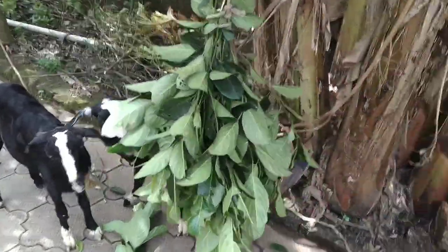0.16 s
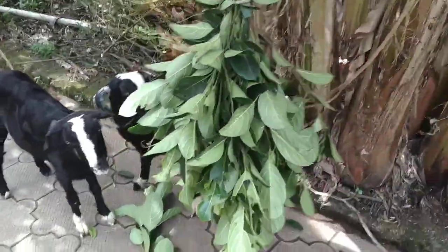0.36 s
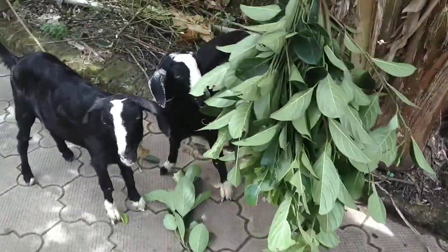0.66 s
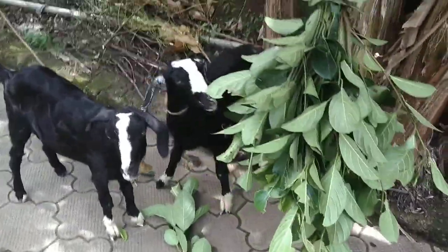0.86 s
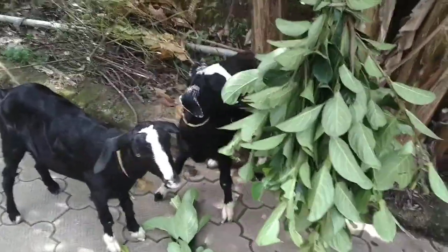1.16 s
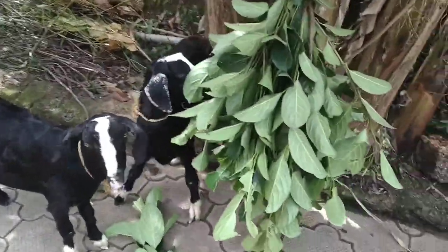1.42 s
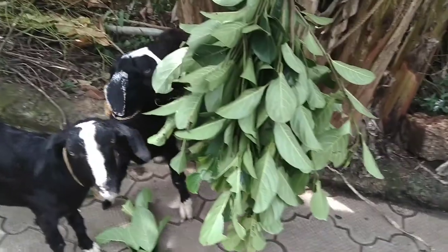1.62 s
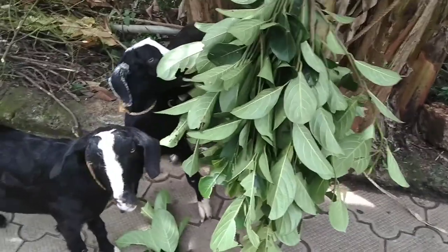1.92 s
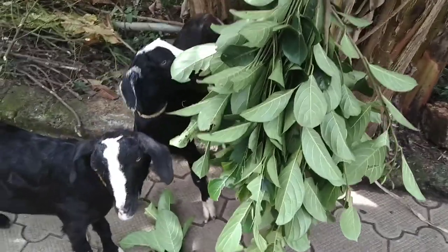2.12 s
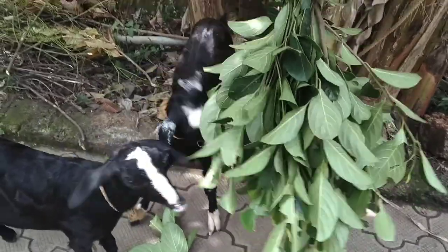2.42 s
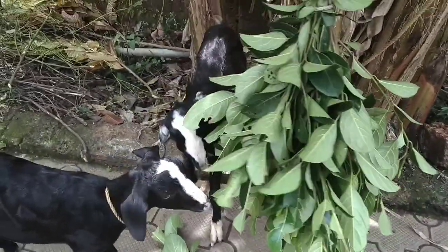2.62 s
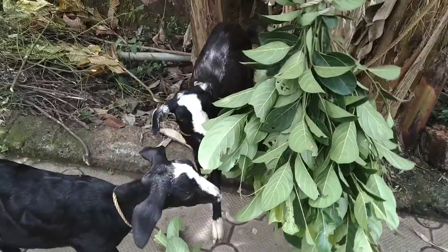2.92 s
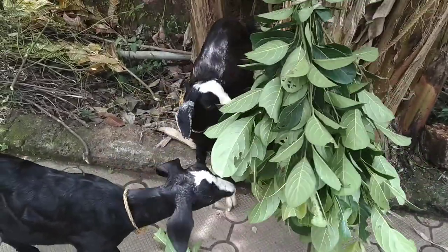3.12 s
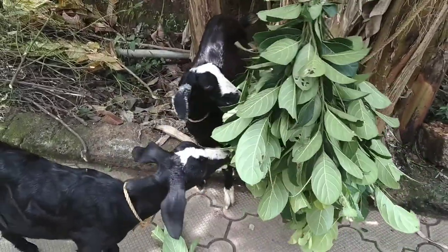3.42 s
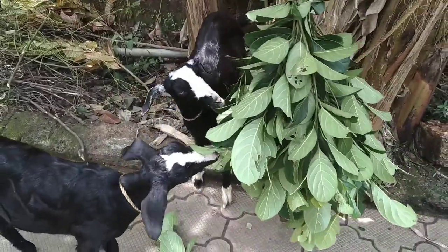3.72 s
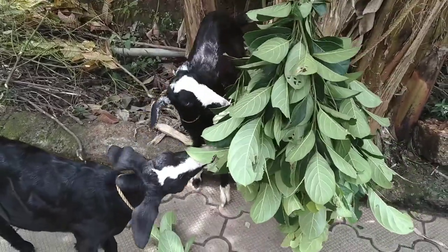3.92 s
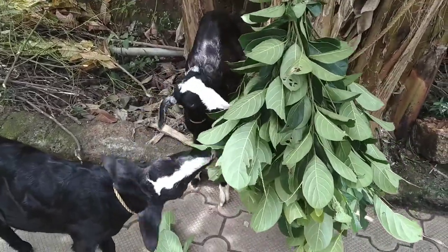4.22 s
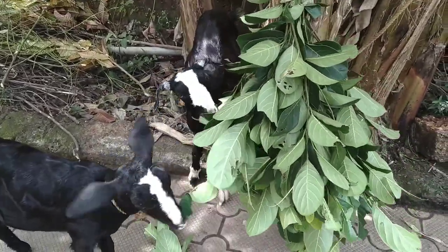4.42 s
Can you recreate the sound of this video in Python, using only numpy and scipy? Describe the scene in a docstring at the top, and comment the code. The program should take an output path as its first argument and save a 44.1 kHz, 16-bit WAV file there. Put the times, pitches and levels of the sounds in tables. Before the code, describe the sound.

Under a faint outdoor hush, leaves rustle lightly as goats feed close by, and a small bird gives high chirps while another rasps from the trees. The goats pull harder, so the bundle crackles and flaps, stalks snap sharply and hooves knock softly on paving. After a distant rising whoop and two clear falling whistles, more stalks crack and a leaf tears. The yard adds a short echo.

```python
"""Two goats tug at a hanging bundle of fresh leaves in a paved, echoing yard.
Leaves rub and crackle, stalks snap, the bundle flaps back after hard pulls and one leaf rips.
Hooves knock on the paving with short, dull rings. A small bird twitters nearby in gliding tones,
and larger birds rasp, whistle and whoop from the trees, over a faint hush of open air."""
import sys
import numpy as np
from scipy import signal
from scipy.fft import rfft, irfft, next_fast_len
from scipy.io import wavfile
from scipy.ndimage import uniform_filter1d, map_coordinates

SR = 44100
rng = np.random.default_rng(int(sys.argv[2]) if len(sys.argv) > 2 else 0)


def master_out(mix):
    """Clip the mix to full scale and print it as 16-bit PCM to the path in sys.argv[1]."""
    frames = np.transpose(np.atleast_2d(mix))
    ceiling = np.clip(frames, -1, 1)
    pcm = np.round(ceiling * 32767).astype(np.int16)
    wavfile.write(sys.argv[1], SR, pcm)


N = 201404
TOP_HZ = 15500  # the highest pitch in the scene


def amp(db):
    """Turn decibels into a number to multiply by."""
    return 10 ** (np.asarray(db) / 20)


def unit(x):
    """Scale a sound to an average (rms) strength of 1."""
    return x / np.sqrt(np.mean(x ** 2) + 1e-20)


def along(points, hz):
    """Read between the rows of a (pitch_hz, value) table, on a musical (log) scale."""
    pitches, values = np.transpose(points)
    return np.interp(np.log(hz + 1), np.log(pitches + 1), values)


def curves(rows):
    """Join the rows of a timed table into one curve for each column after the time."""
    times, *columns = np.transpose(rows)
    return [np.interp(np.arange(N) / SR, times, column) for column in columns]


def during(rows):
    """A soft switch, on from the first row's time to the last."""
    t = np.arange(N) / SR
    return uniform_filter1d(1. * ((t > rows[0][0]) & (t < rows[-1][0])), size=600)


def wobble(per_s):
    """A smooth curve through per_s random values each second."""
    points = rng.standard_normal(int(N * per_s / SR) + 4)
    return map_coordinates(points, [np.arange(N) * per_s / SR])


def swell(peak_s, rise_s, fall_s, hold_s=0):
    """A level that climbs 20 dB in rise_s, holds, then drops 20 dB in fall_s."""
    t = np.arange(N) / SR - peak_s
    away = np.maximum(-t, 0) / rise_s + np.maximum(t - hold_s, 0) / fall_s
    return amp(-20 * np.minimum(away, 10) ** 1.22)  # a power over 1 rounds the top


def filtered(x, response):
    """Turn each pitch in a sound up or down by response(hz)."""
    size = next_fast_len(N + SR // 2)
    return irfft(rfft(x, size) * response(np.fft.rfftfreq(size, 1 / SR)), size)[:N]


def coloured(x, tone):
    """Give a sound the tone in a (pitch_hz, level_db) table, at strength 1."""
    return unit(filtered(x, lambda hz: amp(along(tone, hz))))


def add(track, start_s, sound):
    """Mix a sound into the track at start_s."""
    part = track[round(start_s * SR):][:len(sound)]
    part += sound[:len(part)]


def echo(x, fades):
    """A blurred echo in which each pitch dies away at its own speed."""
    hz, t, noise = signal.stft(rng.standard_normal(SR), SR, nperseg=256)
    fading = amp(-60 * t / along(fades, hz)[:, None])
    tail = signal.istft(noise * fading, SR, nperseg=256)[1]
    return signal.fftconvolve(x, tail / np.linalg.norm(tail))[:N]


def crackle(spread_db, fade_s, rub_db, count):
    """Surfaces catch and slip: tiny ticks of random pitch and size over smooth rubbing."""
    when, pitch, size = rng.random((count, 3)).T[:, :, None]
    t = np.arange(SR // 200) / SR
    size_db = spread_db * np.minimum(-np.log(1 - size), 4)
    # here and below, fade_s is the time to die away by 60 dB
    ticks = amp(size_db - 60 * t / fade_s) * np.sin(2 * np.pi * pitch * TOP_HZ * t)
    places = (when * N).astype(int) + np.arange(len(t))
    ticking = unit(np.bincount(places.ravel(), ticks.ravel(), N)[:N])
    return ticking + amp(rub_db) * rng.standard_normal(N)


# How much nibbling stirs the bundle between tugs: time_s, level_db
NIBBLING = [(0, -57.5), (.3, -64), (.85, -59), (1.22, -65.5), (1.38, -72), (1.7, -61), (2.08, -64.5),
            (2.4, -45.5), (3.02, -63), (3.45, -54.5), (4.03, -65), (4.18, -50), (4.56, -57)]
# Tugs at the leaves: peak_s, level_db, rise_s, fall_s, crispness_db
LEAF_TUGS = [(.02, -60, .1, 0.16, -0.5), (.09, -57.5, 0.062, 0.14, -17), (.592, -46, 0.035, 0.12, -11),
             (0.929, -52, 0.12, 0.35, -7.5), (1.17, -55.5, 0.088, 0.26, -9.5),
             (1.59, -50, 0.063, 0.05, -17.5), (1.974, -44.5, 0.11, 0.076, -11),
             (2.14, -43.5, 0.0088, 0.072, -12), (2.276, -43, 0.057, 0.089, -17),
             (2.328, -37.5, .006, 0.12, -8.5), (2.439, -42, .04, 0.03, -17), (2.501, -41, 0.02, 0.093, -10),
             (2.574, -48, 0.056, 0.071, -8.5), (2.724, -44.5, 0.061, 0.027, -12.5),
             (2.788, -51, 0.016, 0.045, -18), (2.84, -51.5, .03, .05, -9), (2.95, -53.5, 0.06, .04, -11),
             (3.34, -58.5, 0.07, 0.078, -5), (3.978, -54, 0.058, 0.017, -13.5)]
# The tone of rubbing leaves: pitch_hz, level_db
RUSTLE_TONE = [(40, -69), (300, -16.5), (800, -16.5), (1400, -17.5), (2100, -3.5), (2700, -1.5), (3150, -1),
               (3800, -15), (5500, -16.5), (8000, -41.5)]
# The tone of their crisp, high edge: pitch_hz, level_db
CRISP_TONE = [(2500, -24), (3600, -21.5), (4500, -6), (5600, 1.5), (6800, 4), (7700, -2), (9000, -8),
              (15000, -3)]


def rustling():
    """Leaf slides on leaf as the goats nibble; each tug swells the rustle and its crisp edge."""
    stir_db = curves(NIBBLING)[0] + 1.7 * wobble(per_s=13)  # single nibbles come and go
    rustle_power, edge_power = amp(stir_db) ** 2, amp(stir_db - 15) ** 2
    for peak_s, level_db, rise_s, fall_s, crispness_db in LEAF_TUGS:
        pull = amp(level_db) * swell(peak_s, rise_s, fall_s, hold_s=0.0026)
        rustle_power += pull ** 2
        edge_power += (amp(crispness_db) * pull) ** 2
    rustle = coloured(crackle(spread_db=3.5, fade_s=0.0041, rub_db=2.5, count=24000), RUSTLE_TONE)
    edge = coloured(crackle(spread_db=1.0, fade_s=0.0012, rub_db=-2, count=20000), CRISP_TONE)
    return amp(1) * np.sqrt(rustle_power) * rustle + amp(10) * np.sqrt(edge_power) * edge


# How the outdoor hush rises and falls: time_s, level_db
AIR_LEVELS = [(0.0, -67), (1.54, -71), (2.0, -67), (2.52, -64), (2.78, -65), (4.57, -69)]
# The tone of that hush: pitch_hz, level_db
AIR_TONE = [(20, -30), (50, -17), (110, -8), (200, -13.5), (300, -3.5), (430, -5.5), (800, -8.5),
            (1500, -9), (2100, -8.5), (2900, -4), (4200, -20), (6500, -10.5), (8000, -18.5), (10000, -64)]


def air():
    """Open air makes a faint, slowly shifting hush."""
    level_db = curves(AIR_LEVELS)[0] + 10.5 + wobble(per_s=4.13)
    return amp(level_db) * coloured(rng.standard_normal(N), AIR_TONE)


def song(notes, waver, wavers_per_s):
    """Bird notes: each is one tone that glides through three pitches and quavers."""
    out, quaver = np.zeros(N), 1 + waver * wobble(wavers_per_s)
    for start_s, length_s, start_hz, middle_hz, end_hz, level_db in notes:
        progress = np.linspace(0, 1, int(length_s * SR))
        glide_hz = np.polyval(np.polyfit([0, .5, 1], [start_hz, middle_hz, end_hz], 2), progress)
        pitch_hz = glide_hz * np.roll(quaver, -round(start_s * SR))[:len(progress)]
        loudness = amp(level_db) * np.sqrt(2 * np.abs(np.sin(np.pi * progress)))
        add(out, start_s, loudness * np.sin(2 * np.pi * np.cumsum(pitch_hz) / SR))
    return out


# Hoarse calls from the trees: start_s, length_s, start_hz, middle_hz, end_hz, level_db
RASP_NOTES = [(.495, 0.13, 1495, 1631, 1740, -55), (1.49, .16, 1544, 1738, 1784, -53.5)]


def rasps():
    """A far bird's rising notes quaver so fast and wide that they sound hoarse."""
    return song(RASP_NOTES, waver=.09, wavers_per_s=600)


# The small bird's short chirps: start_s, length_s, start_hz, level_db
CHIRPS = [(0.508, 0.028, 5190, -52.5), (0.633, 0.027, 5240, -54), (0.716, 0.06, 4910, -58.5),
          (0.733, .03, 3760, -54.5), (0.803, 0.059, 4340, -58.5), (0.981, 0.021, 4120, -47),
          (3.62, .02, 4605, -62.5), (3.728, 0.05, 4400, -61), (4.526, 0.047, 5210, -55.5)]
# Its louder call shoots up, falls back and levels off: time_in_call_s, pitch_hz, level_db
CALL_SHAPE = [(0, 5180, -3), (.011, 6600, 4.5), (.023, 7370, -6.5), (.04, 6320, 2.5), (.055, 6240, -2.5),
              (.08, 6220, -10)]
# When it gives that call: start_s, level_db
CALLS = [(.84, -48.5), (1.079, -47)]


def twitter():
    """The small bird whistles chirps that all rise by the same step, and one arching call twice."""
    chirps = [(start_s, length_s, hz, hz * 1.12, hz * 1.2, db) for start_s, length_s, hz, db in CHIRPS]
    out = song(chirps, waver=.018, wavers_per_s=900)
    pitch_hz, shape_db = curves(CALL_SHAPE)
    for start_s, level_db in CALLS:
        quaver = 1 + 0.021 * wobble(per_s=700)
        tone = np.sqrt(2) * np.sin(2 * np.pi * np.cumsum(pitch_hz * quaver) / SR)
        add(out, start_s, amp(level_db + shape_db) * during(CALL_SHAPE) * tone)
    return out


# Whistles from the trees: start_s, length_s, start_hz, middle_hz, end_hz, level_db
WHISTLE_NOTES = [(.97, 0.18, 2200, 2032, 2066, -60.5), (3.503, 0.085, 3830, 3074, 2650, -43),
                 (3.575, .085, 2938, 2640, 2487, -41)]


def whistles():
    """A far bird whistles clear, falling notes with a slight quaver."""
    return song(WHISTLE_NOTES, waver=.022, wavers_per_s=500)


# Hoof steps and dull bumps: start_s, level_db, pitch_hz, fade_s
STEPS_AND_BUMPS = [(1.483, -39.5, 124, 0.022), (1.501, -34.5, 1010, 0.008), (2.128, -38, 800, 0.063),
                   (2.132, -52, 248, 0.069), (2.324, -48, 756, 0.042), (2.325, -61, 285, 0.11),
                   (2.501, -43.5, 324.5, 0.27), (2.517, -46, 129, 0.14), (2.590, -35, 243, 0.13),
                   (2.785, -50, 850, 0.036), (4.218, -45, 347, 0.064)]


def knocks(scuff=0.56, contact_cycles=0.28):
    """Each step or bump is a short, low ring with a soft start, roughened by a scuff."""
    out, t = np.zeros(N), np.arange(SR // 6) / SR
    for start_s, level_db, pitch_hz, fade_s in STEPS_AND_BUMPS:
        tone = np.sin(2 * np.pi * pitch_hz * t)
        grain = np.gradient(tone * np.exp(-2 * pitch_hz * t))
        grit = unit(signal.fftconvolve(rng.standard_normal(len(t)), grain)[:len(t)])
        contact = 1 - np.exp(-t * pitch_hz / contact_cycles)
        add(out, start_s, amp(level_db - 3 - 60 * t / fade_s) * contact * (tone + scuff * grit))
    return out


def ring(tones, t):
    """Tones that die fast (wider ones faster), tuned a little differently at every break."""
    sound = np.zeros(len(t))
    for pitch_hz, width_hz, level_db in tones:
        tuned_hz = pitch_hz * np.exp(0.01 * rng.normal())
        sound += amp(level_db) * np.exp(-np.pi * width_hz * t) * np.sin(2 * np.pi * tuned_hz * t)
    return sound / np.abs(sound).max()


# Stalks and leaf ribs breaking: start_s, level_db, pitch_hz, splinter_db (relative to the crack)
STALK_BREAKS = [(1.967, -31, 2520, -19), (2.133, -29, 2480, -19), (2.3236, -14, 2270, -3),
                (2.331, -11.5, 2200, -0.5), (2.446, -37, 2930, -11), (2.718, -36, 2760, -11),
                (2.785, -30, 2000, -28), (3.094, -33, 2980, 1), (4.104, -31, 2900, -22),
                (4.2147, -13.5, 3280, 1), (4.218, -14, 3040, -27), (4.2229, -20, 2800, 9),
                (4.246, -26, 2900, 0), (4.273, -17, 2930, -1), (4.33, -19.5, 3150, -12)]
# The high tones of splintering fibres: pitch_hz, width_hz, level_db
SPLINTER_TONES = [(4800, 1350, 7), (5650, 1300, 2), (6950, 4500, 1)]


def snaps(fibres_db=-11, fibres_fade_s=0.021, stalk_width_hz=650):
    """A stalk gives way with one crack at its own pitch, then its last fibres tear."""
    out, t = np.zeros(N), np.arange(SR // 16) / SR
    for start_s, level_db, pitch_hz, splinter_db in STALK_BREAKS:
        force = amp(fibres_db - 60 * t / fibres_fade_s) * rng.standard_normal(len(t))
        force[0] = 1  # the break itself
        stalk = ring([(pitch_hz, stalk_width_hz, 0)], t)
        splinters = amp(splinter_db) * ring(SPLINTER_TONES, t)
        crack = signal.fftconvolve(force, stalk + splinters)
        crack = np.diff(crack, prepend=0)  # a thin stalk gives off little bass
        add(out, start_s, amp(level_db - 1.5) * crack / np.abs(crack).max())
    return out


# The bundle flapping back: peak_s, level_db
BUNDLE_FLAPS = [(2.134, -41), (2.324, -38.5), (2.431, -48.5), (2.508, -39.5), (2.594, -45.5), (2.719, -46),
                (2.79, -49)]
# The tone of a flap: pitch_hz, level_db
FLAP_TONE = [(30, -46), (70, -16), (130, -21), (300, 4.5), (550, -9.5), (1100, 4.5), (1900, 3.5), (2600, 8),
             (5000, -51)]


def flapping():
    """Hard pulls swing the whole bundle, which flaps back with a deeper rustle."""
    swing = sum(amp(db) * swell(peak_s, rise_s=0.012, fall_s=0.057) for peak_s, db in BUNDLE_FLAPS)
    return swing * coloured(crackle(spread_db=-1.5, fade_s=0.0063, rub_db=-0.5, count=16000), FLAP_TONE)


# A far bird's rising whoop: time_s, pitch_hz, level_db, roughness (a share of the pitch)
WHOOP_SHAPE = [(3.16, 684, -61.5, .08), (3.275, 654, -48, 0.1014), (3.335, 723, -43, 0.14),
               (3.37, 941, -41.5, 0.044), (3.425, 956, -38.5, .018), (3.46, 962, -52, 0.032)]
# How its throat shapes the tone: pitch_hz, level_db
THROAT_TONE = [(600, -2.5), (1000, -3), (1350, -18.5), (1800, -16.5), (2250, -0.5), (2650, -12), (3000, -9)]


def whoop():
    """A hollow call leaps up hoarsely to a clean top note; the throat favours one band of overtones."""
    pitch_hz, level_db, roughness = curves(WHOOP_SHAPE)
    phase = 2 * np.pi * np.cumsum(pitch_hz * (1 + roughness * wobble(per_s=400))) / SR
    voice = sum(np.sin(harmonic * phase) for harmonic in (1, 2, 3))
    call = amp(level_db) * during(WHOOP_SHAPE) * np.sqrt(2) * voice
    return filtered(call, lambda hz: amp(along(THROAT_TONE, hz)))


# The tone of a leaf ripping off its twig: pitch_hz, level_db
RIP_TONE = [(200, -59), (900, -22.5), (1500, -15), (2200, -10), (2800, -2), (3300, 0.5), (3900, -10),
            (5500, -13), (7600, -10.5), (10000, -8), (15000, -31)]


def ripping():
    """A leaf's veins part one after another: a thin, bright crackle that builds, holds and fades."""
    veins = crackle(spread_db=-0.5, fade_s=0.0025, rub_db=1.0, count=16000)
    pull = amp(-35) * swell(peak_s=4.277, rise_s=0.084, fall_s=.08, hold_s=0.075)
    return pull * (coloured(veins, RIP_TONE) + amp(-12) * coloured(veins, CRISP_TONE))


# The short echo of the yard: pitch_hz, fade_s
YARD_ECHO = [(200, 0.15), (2500, 0.1), (8000, 0.11)]
# The long echo among the trees: pitch_hz, fade_s
TREE_ECHO = [(600, 0.88), (1000, 1.31), (2500, 0.62), (6500, 0.34)]


def scene(wall_delay_s=.012):
    """The goats and the small bird echo in the yard; the trees scatter all the birds' calls."""
    jerks = amp(2.0 * wobble(per_s=70))  # leaves slide in small jerks
    goats = jerks * (rustling() + flapping()) + ripping() + snaps() + knocks()
    goats_in_yard = amp(-0.38) * goats + amp(-6.5) * echo(goats, YARD_ECHO)
    near = twitter()
    off_wall = amp(-2) * np.roll(near, round(wall_delay_s * SR))
    near_bird = amp(-5) * (near + off_wall) + amp(-2) * echo(near, YARD_ECHO)
    far = whistles() + rasps() + whoop()
    far_birds = amp(-6.5) * far + amp(-2) * echo(far, TREE_ECHO)
    near_bird += amp(-6.5) * echo(near, TREE_ECHO)
    return (goats_in_yard + near_bird + far_birds + air())[None]


# How strongly the microphone picks up each pitch: pitch_hz, level_db
MICROPHONE_TONE = [(20, -12), (60, -8), (110, -1), (7600, 1), (8300, -9), (9100, -25), (10500, -31.5),
                   (15000, -32.5)]


def record(dry):
    """The microphone thins the deep bass, dulls the top octave and keeps nothing above TOP_HZ."""
    return filtered(dry[0], lambda hz: amp(along(MICROPHONE_TONE, hz)) * (hz < TOP_HZ))[None]


dry = scene()
out = record(dry)
master_out(out)
```